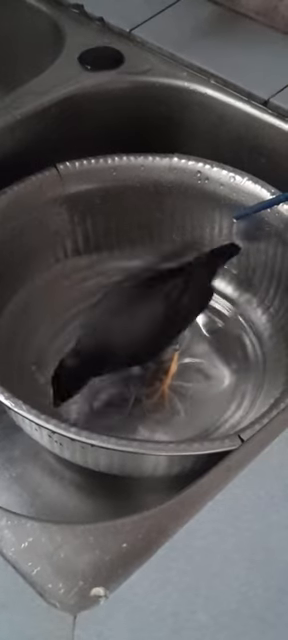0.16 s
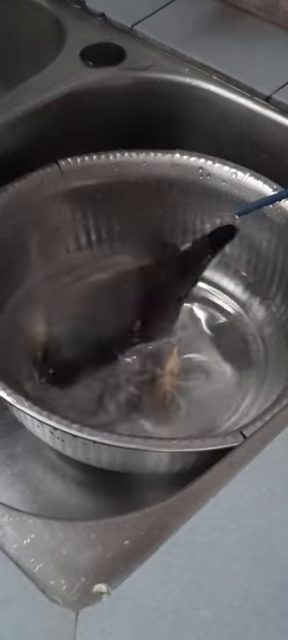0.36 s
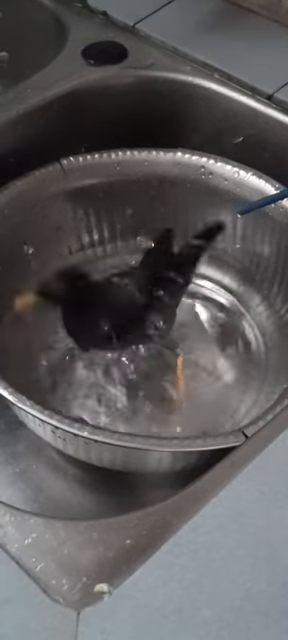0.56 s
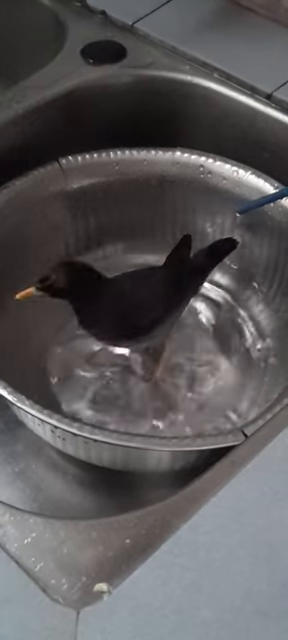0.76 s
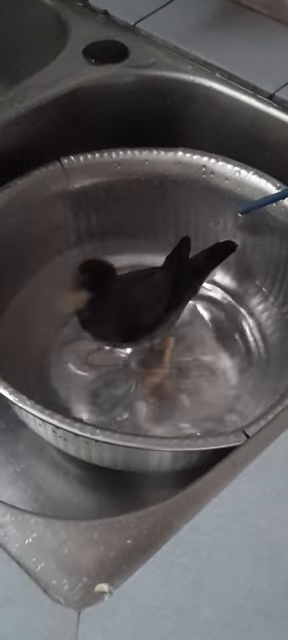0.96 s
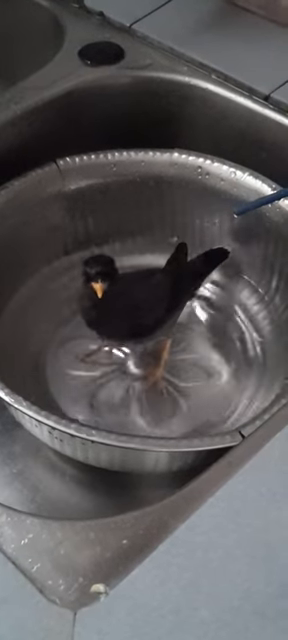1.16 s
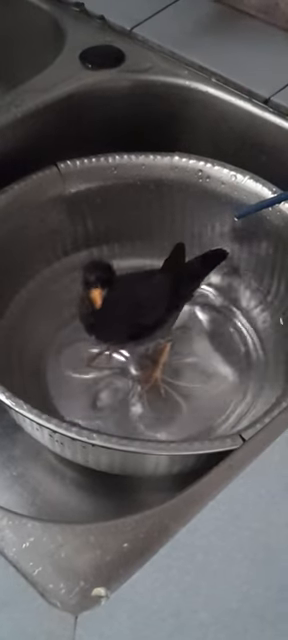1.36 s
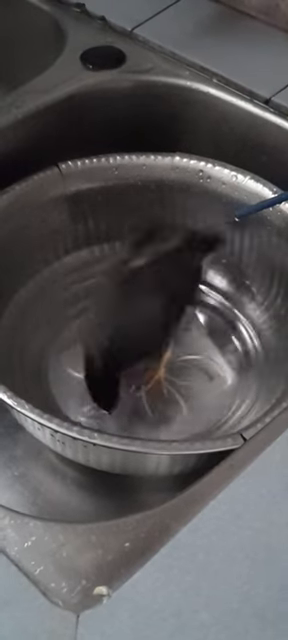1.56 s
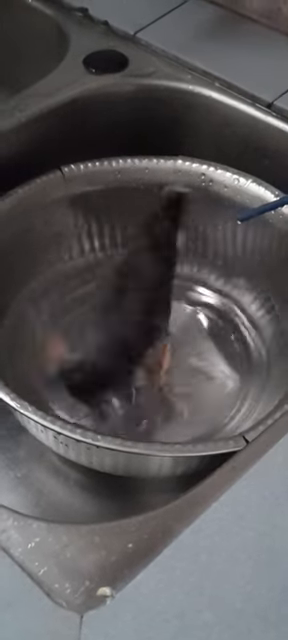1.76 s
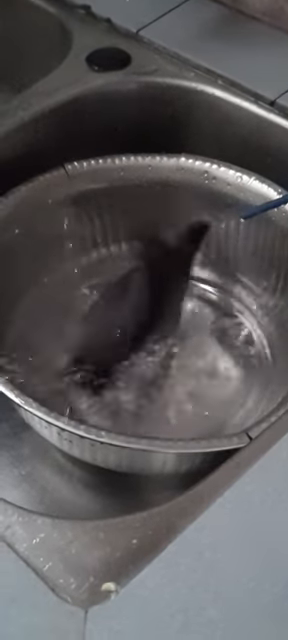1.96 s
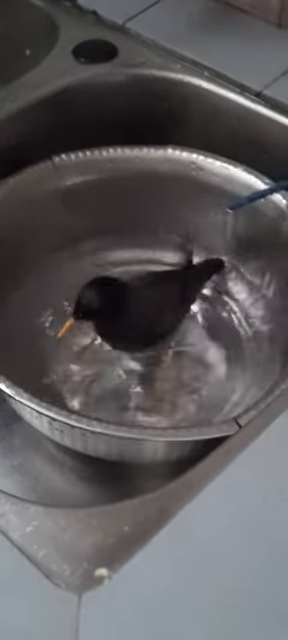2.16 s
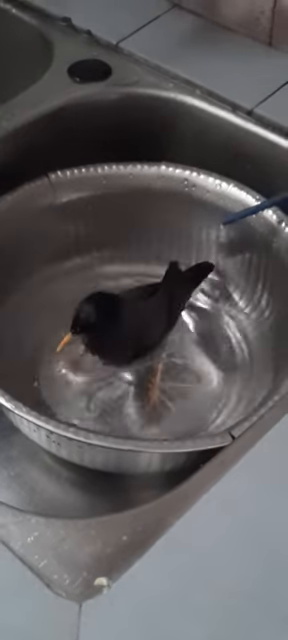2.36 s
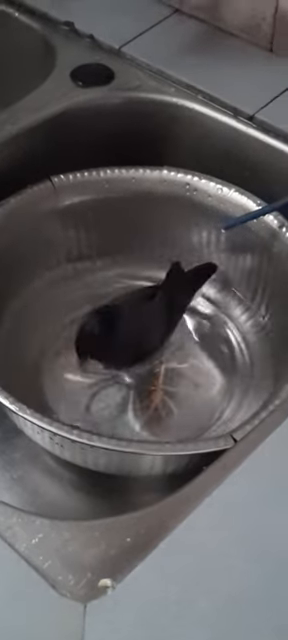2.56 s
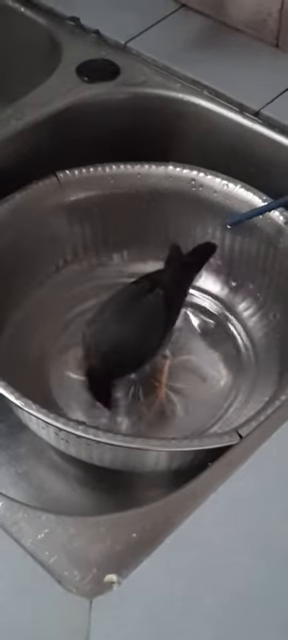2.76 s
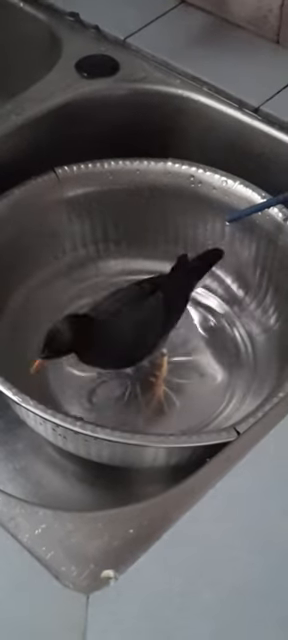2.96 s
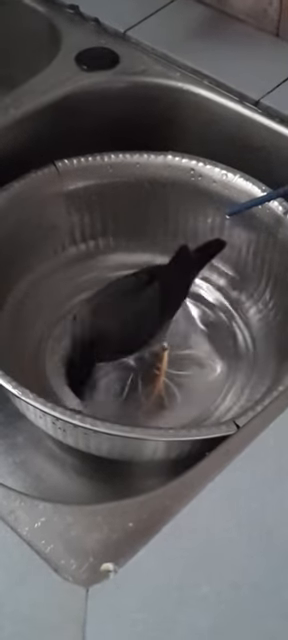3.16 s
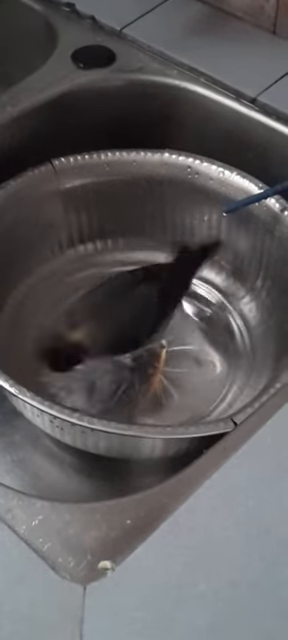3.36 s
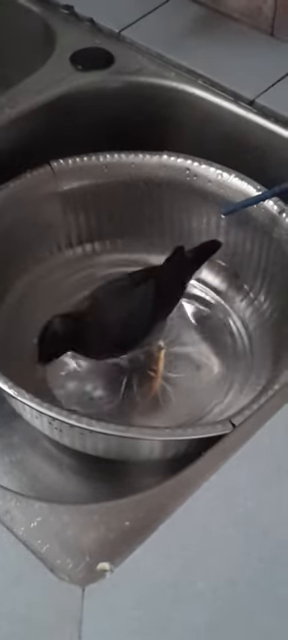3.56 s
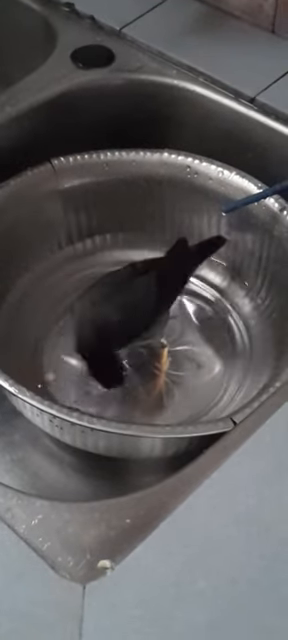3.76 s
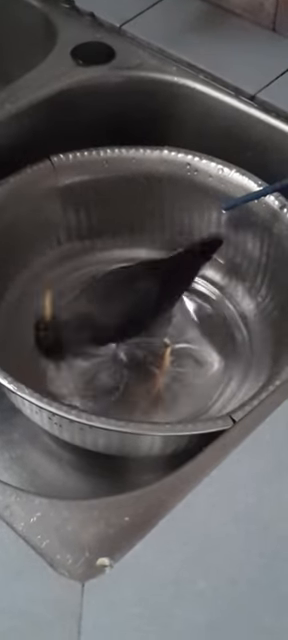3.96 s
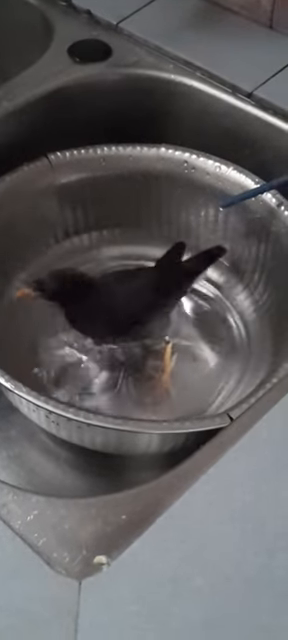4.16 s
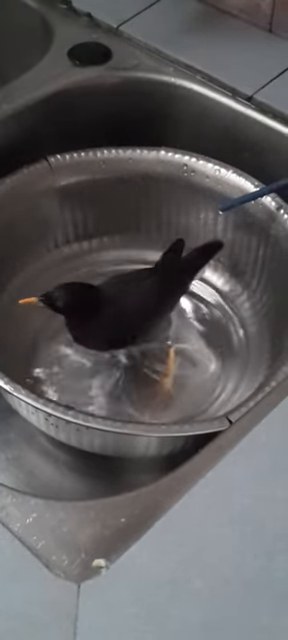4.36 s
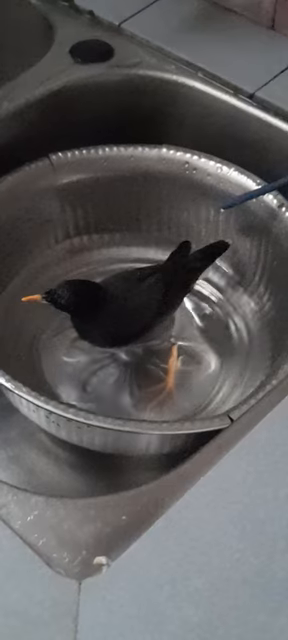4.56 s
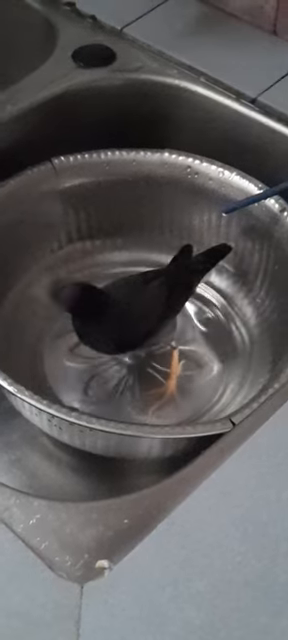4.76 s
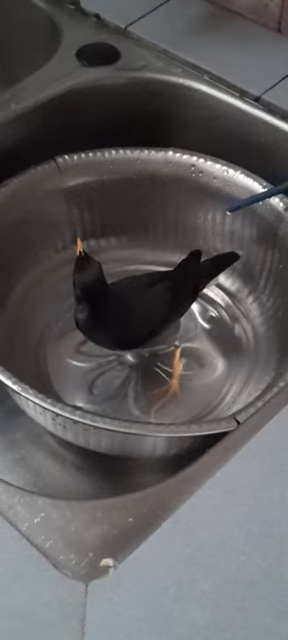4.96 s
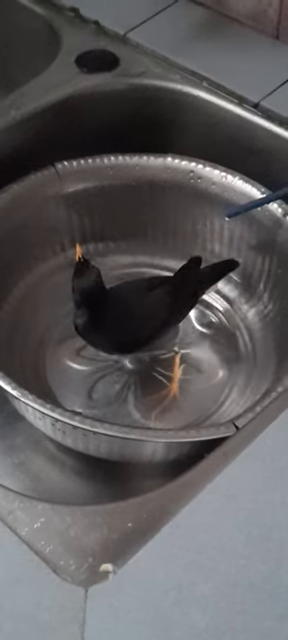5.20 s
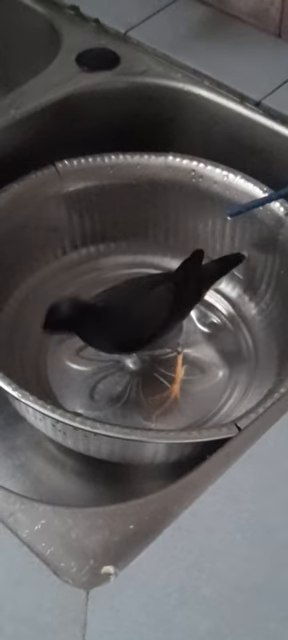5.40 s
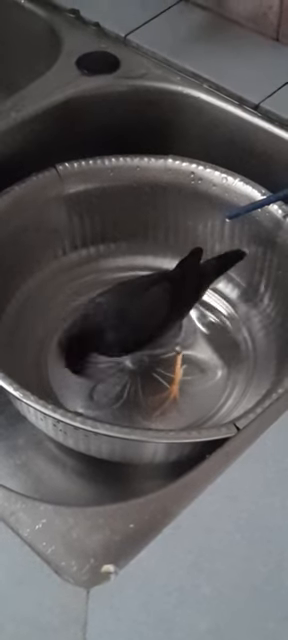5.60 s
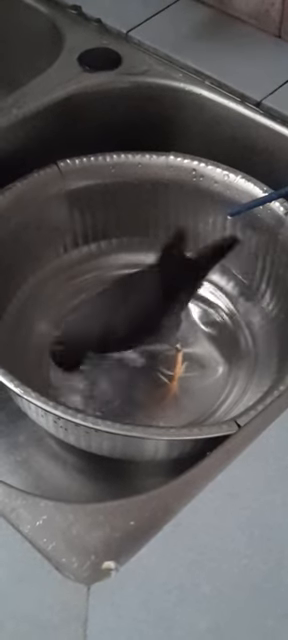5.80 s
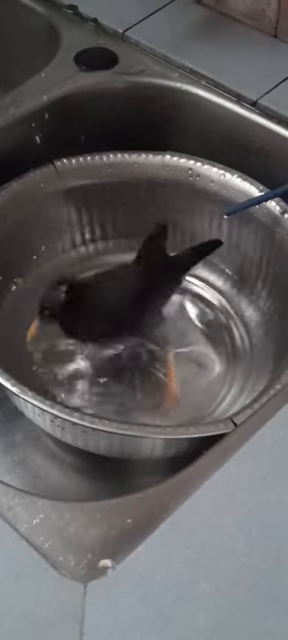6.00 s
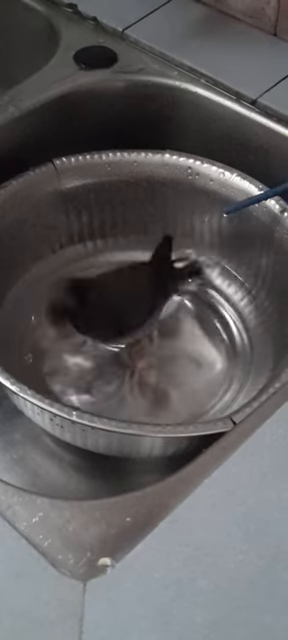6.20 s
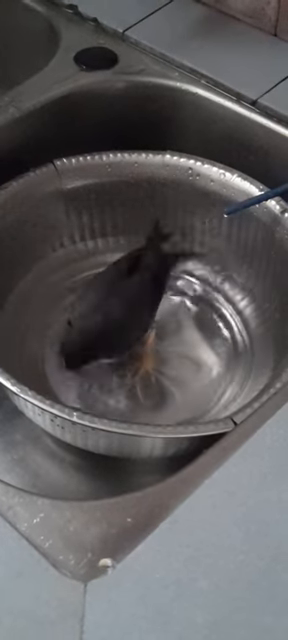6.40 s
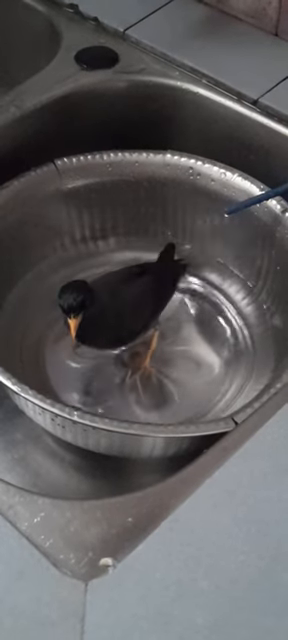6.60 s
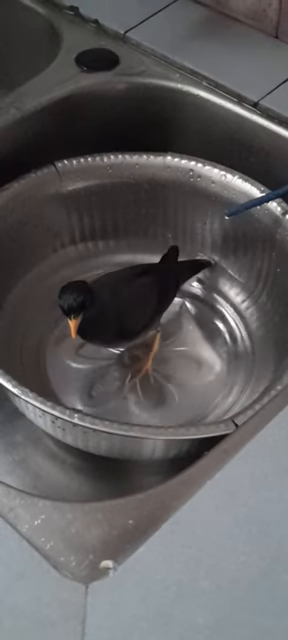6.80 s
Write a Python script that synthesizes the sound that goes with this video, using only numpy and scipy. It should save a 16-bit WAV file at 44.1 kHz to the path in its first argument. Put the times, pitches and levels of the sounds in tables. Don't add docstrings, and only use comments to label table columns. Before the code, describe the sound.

Close up, wings flutter against shallow water in sharp, wet bursts, throwing fine droplets that patter and trapping bubbles that plop. The bird pauses, leaving low electrical hum and room rumble, then flutters hard again. Gentler dabbling follows, then a final medium splash with bubbly gurgles and a few stray drips. The steel bowl booms softly and kitchen tiles add a brief bright reflection; stereo microphones sit near.

```python
import sys
import numpy as np
from scipy import signal
from scipy.io import wavfile
from scipy.ndimage import uniform_filter1d

SR = 44100
rng = np.random.default_rng(int(sys.argv[2]) if len(sys.argv) > 2 else 0)


def boost(x):
    u = np.asarray(x, float) / 20
    return 10 ** u


def master(y):
    cut = np.clip(np.atleast_2d(y).T, -1, 1)
    pcm = np.round(cut * 32767)
    wavfile.write(sys.argv[1], SR, pcm.astype(np.int16))


N = 301644


def evened(x):
    return x / np.sqrt(np.mean(x ** 2) + 1e-20)


def read(points, hz):
    f, value = np.transpose(points)
    return np.interp(np.log(hz + 1), np.log(f + 1), value)


def coloured(x, points):
    size = 8192
    gain_db = np.maximum(read(points, abs(np.fft.fftfreq(size, 1 / SR))), -70)
    log_gain = np.log(boost(gain_db))
    taps = np.fft.ifft(np.exp(np.conj(signal.hilbert(log_gain)))).real[:size // 2]
    taps = (taps / np.linalg.norm(taps)).reshape((1,) * (x.ndim - 1) + (-1,))
    return signal.oaconvolve(x, taps, axes=-1)[..., :N]


def below(x, hz):
    return signal.oaconvolve(x, signal.firwin(127, hz, fs=SR)[None], "same")


def above(x, hz, order):
    return signal.sosfilt(signal.butter(order, hz, "high", fs=SR, output="sos"), x)


def resonate(x, hz, width):
    turn = np.exp(2j * np.pi * hz * np.arange(x.shape[-1]) / SR)
    r = np.exp(-np.pi * width / SR)
    return 2 * (turn * signal.lfilter([1 - r], [1, -r], x / turn)).real


def add(mix, s, sound):
    part = mix[..., round(s * SR):][..., :sound.shape[-1]]
    part += sound[..., :part.shape[-1]]


# frequency in Hz, left-right likeness (-1 to 1).
SAME = [(25, 0.2), (60, 0.68), (180, 0.9), (550, 0.48), (1650, -0.23), (4970, 0.29), (15000, -0.2)]


def air(points, lo_hz, patchy_db):
    frames, hz = N // 512 + 5, np.fft.rfftfreq(2048, 1 / SR)
    a, b, c, d, patches = rng.standard_normal((frames, 1025, 5)).T
    patches = evened(uniform_filter1d(uniform_filter1d(patches, 30, 0), 12, 1))
    same = np.clip(read(SAME, hz), -1, 1)[:, None]
    left = a + 1j * b
    right = same * left + np.sqrt(1 - same ** 2) * (c + 1j * d)
    z = np.array([left, right]) * boost(read(points, hz)[:, None] + patchy_db * patches)
    whole_to_heard = np.sqrt((abs(z) ** 2).sum() / (abs(z[:, hz > lo_hz]) ** 2).sum())
    return evened(signal.istft(z, nperseg=2048, noverlap=1536)[1][:, :N]) * whole_to_heard


# frequency in Hz, spectrum level in dB per Hz.
RUMBLE = [(13, -59), (22, -47), (69, -8), (83, -11), (102, -9.5), (124, -13.5), (154, -9.5), (174, -22),
          (311, -10.5), (420, -18.5), (588, -22), (620, -22.5), (1500, -33.5), (1950, -53.5), (3300, -120)]
# frequency in Hz, spectrum level in dB per Hz.
HISS = [(760, -49), (1300, -14), (1870, -12), (2010, -11.5), (2490, -13), (3240, -15.5), (3570, -13),
        (4060, -15), (4500, -15), (5700, -19), (6540, -14), (8440, -19), (14700, -15), (15800, -18.5),
        (16500, -37)]
# frequency in Hz, width in Hz, level in dB.
ROOM_MODES = [(113.7, 4.9, -59), (144.2, 7.2, -61.5), (318, 65, -64.5)]
# frequency in Hz, width in Hz, level in dB.
HUM_AIR = (100.9, 9.6, -55.5)


def kitchen():
    t = np.arange(N) / SR
    hum = np.sqrt(2) * boost(-52.5) * np.sin(2 * np.pi * 100.06 * t - np.array([[.3], [0]]))
    whine = np.sqrt(2) * boost(-66.5) * np.sin(2 * np.pi * 577.5 * t + [[0], [.8]])
    feed = rng.standard_normal(N) + 0.32 * rng.standard_normal((2, N))
    modes = np.zeros((2, N))
    for hz, width, db in ROOM_MODES + [HUM_AIR]:
        modes += boost(db) * evened(resonate(resonate(feed, hz, width), hz, width))
    floor = boost(-57.5) * air(RUMBLE, lo_hz=160, patchy_db=.4)
    floor = floor + boost(-72) * air(HISS, lo_hz=2370, patchy_db=.4)
    return floor * boost([[-.7], [.7]]) + hum * boost([[1.5], [-1.5]]) + modes + whine


# start in seconds, peak in dB, heavy drops in dB, fine mist in dB.
WINGS = [(0.1248, -38, 14, -18), (0.1674, -31, 3.5, -8), (0.2733, -63, -3, -5), (0.3125, -36, 4, -2),
         (0.333, -38, -3, 1), (0.3711, -25.5, 1, 2.5), (0.4177, -22, 1, 2), (0.4577, -18.5, 3.5, -3.5),
         (0.501, -26, 3, 4), (0.6423, -41, 16, 12), (0.6756, -39, -1, 9), (0.6982, -45, -5, 13.5),
         (0.7234, -33.5, -3.5, 0), (1.7679, -61, -20, 7), (1.7873, -42, -7, 7), (1.8312, -24, 4, -7),
         (1.8714, -19.5, 3.5, 2), (1.918, -22, -5, 0), (1.9604, -21.5, 7.5, -4), (1.981, -29, 0, -18),
         (1.994, -24.5, 8, -18), (2.035, -29, -2, -5), (2.057, -30.5, 11, -3), (1.911, -30, -1, 8),
         (.525, -32, -2, 2), (5.788, -49, -10, 7), (5.824, -45.5, -12, 7), (5.8611, -37, -6, -1),
         (5.8884, -30.5, -3, 5), (5.927, -32, 8, 11), (.507, -28, 0, 1)]
# start in seconds, peak in dB, heavy drops in dB, fine mist in dB.
SHAKES = [(0.908, -50, 3, -2), (1.028, -60.5, -5, 19), (2.4533, -66.5, 2, 16), (2.61, -69, -39, 31),
          (2.8764, -45.5, -19, -3), (3.374, -37, -21, -4), (3.428, -37.5, -7, 4.5), (3.475, -41, 5.5, -4),
          (3.8006, -53, -15, 6), (3.8581, -52, -22, -2), (3.923, -45.5, -13, 7), (3.9784, -33.5, -6, 0.5),
          (4.031, -34.5, 2, 1), (4.0663, -34, -17, -4), (4.2363, -39, -16, -7), (4.2736, -44.5, -1, 4),
          (4.349, -46.5, 5, 1), (6.122, -36.5, -17, 5), (6.1441, -31.5, -29, 1), (6.2668, -54.5, 21, 1),
          (6.2913, -47, -2, 4), (6.3663, -53, 11, 2), (6.4413, -52, -11, 10), (6.472, -43, -17, 3),
          (6.5998, -51, -9, -1)]
# frequency in Hz, dB per Hz.
SPRAY_COLOUR = [(1350, -46), (2300, -7), (2930, -5), (3160, -0.5), (3700, -3.5), (3980, -2.5), (4590, -1),
                (5840, 0.5), (6450, 1), (7560, 1), (8210, -6), (11500, -3.5), (15200, -4), (16100, -32),
                (16800, -72)]
# frequency in Hz, dB per Hz.
CHURN_COLOUR = [(290, -36.5), (500, 4), (782, -1.5), (1120, -3), (1270, -2), (1640, -0.5), (2040, 0.5),
                (2800, -8.5), (3640, -57), (6160, -120)]
MIST_HZ, DROPS_HZ = 7700, 4300


def slaps():
    t = np.arange(SR // 4) / SR
    bright, body, heavy, mist = np.zeros((4, 2, N))
    crack = boost(1 - 60 * t / .011) * np.minimum(t / .0007, 1)
    for s, peak_db, heavy_db, mist_db in WINGS + SHAKES:
        body_db = 4 - 0.05 * (peak_db + 35)
        shared, ragged, *own = rng.standard_normal((4, len(t)))
        burst = np.tanh(0.5 * shared + 0.84 * np.array(own)) * boost([[.6], [-.6]])
        tearing = 0.48 * boost(-60 * t / 0.1 + 3.1 * evened(uniform_filter1d(ragged, 40)))
        burst *= boost(peak_db - 5) * (crack + tearing * np.minimum(t / 0.0025, 1))
        add(bright, s, burst)
        add(heavy, s, boost(heavy_db) * burst)
        add(mist, s, boost(mist_db) * burst)
        add(body, s, boost(body_db - 13.5) * burst)
    split = mist + below(bright - mist, MIST_HZ) + below(heavy - bright, DROPS_HZ)
    return coloured(split, SPRAY_COLOUR) + coloured(body, CHURN_COLOUR)


# frequency in Hz, width in Hz, level in dB.
SINK = [(63, 55, 5.5), (125, 68, 4.5), (190, 27, -5.5), (232, 46, -4.5), (378, 82, -3), (541, 58, -6.5),
        (632.4, 5.8, -6.5)]


def sink():
    push, kicks, t = rng.standard_normal(N), np.zeros(N), np.arange(SR // 2) / SR
    ring = np.zeros(N)
    for k, (hz, width, db) in enumerate(SINK):
        ring += (-1) ** k * boost(db) * evened(resonate(push, hz, width))
    slosh = np.minimum(t / 0.01, 1) * boost(-60 * t / 0.62)
    for s, peak_db, *_ in WINGS + SHAKES:
        add(kicks, s, (boost(-45.5 + 1.2 * (peak_db + 22)) * slosh) ** 2)
    ring = above(evened(ring), 45, order=2)
    return np.sqrt(kicks) * np.array([np.roll(ring, 12), ring])


def bubbles(rows, trim_db, rise, t60=None, calm=None):
    out = np.zeros((2, N))
    for s, peak_db, hz, *own in rows:
        life = max(own[0] if own else t60, .005)
        rough = np.clip(calm or 0.27 + 0.5 * (peak_db + 59), 0, .5)
        t = np.arange(round(SR * min(life, .25))) / SR
        wander = evened(uniform_filter1d(rng.standard_normal((2, SR // 4)), 120))
        shake, flutter = rough * wander[:, :len(t)]
        climb = rise * (np.minimum(t / life, 1) - .2)
        turns = np.cumsum(hz * (1 + climb + 0.071 * shake)) / SR
        lag = rng.uniform(0.26, 1.7) * np.array([[1], [0]])
        onset = np.minimum(t / min(0.0016, life / 20), 1)
        ring = boost(peak_db + trim_db - 60 * t / life) * (1 + flutter) * onset
        add(out, s, ring * np.sin(2 * np.pi * turns - lag) * boost([[0.6], [-0.6]]))
    return out


# start in seconds, peak in dB, pitch in Hz, decay in seconds.
FIZZ = [(0.1251, -85, 4210, .03), (0.1675, -31.5, 7240, 0.019), (0.2733, -63, 4570, .03),
        (0.3341, -46, 4570, .025), (0.3716, -31, 4000, 0.011), (0.4214, -30, 6470, 0.023),
        (0.5044, -32.5, 6670, 0.029), (0.565, -42, 3960, 0.065), (0.522, -32, 4120, 0.052),
        (0.5351, -31, 3950, 0.052), (1.8327, -23, 4880, 0.012), (1.8774, -25, 4110, 0.011),
        (1.9609, -22, 6500, 0.022), (1.9964, -30, 5000, 0.022), (2.0363, -35, 4690, 0.048),
        (6.1449, -41, 5260, 0.015), (6.3649, -46, 5500, 0.021), (6.365, -52, 4800, .01),
        (2.609, -39, 6950, 0.007), (3.428, -43, 5300, 0.014), (3.476, -45, 4360, 0.013)]
# start in seconds, peak in dB, pitch in Hz.
BUBBLES = [(0.156, -37, 2024), (0.312, -40.5, 2050), (0.333, -48, 1940), (0.457, -25, 2014),
           (1.871, -29, 2028), (1.92, -30, 1980), (1.969, -25, 2010), (1.981, -25, 1860),
           (1.994, -22.5, 2095), (2.015, -30.5, 1950), (2.058, -22, 2135), (2.067, -32, 2246),
           (2.118, -38, 2090), (2.14, -47, 2120), (1.938, -40, 2250), (1.833, -45, 2140),
           (3.429, -40, 2040), (3.989, -46, 2060), (4.031, -42, 2030), (4.065, -30, 2085),
           (5.961, -36, 1926), (6.14, -45, 2390), (1.969, -34, 3130), (5.922, -33, 2460),
           (6.306, -46, 2120)]
# start in seconds, peak in dB, pitch in Hz, decay in seconds.
PLOPS = [(0.418, -30, 1410, 0.035), (1.968, -32, 1470, .025), (1.979, -27, 1540, 0.024),
         (2.058, -34, 1550, 0.013), (2.108, -42, 1500, .015), (3.375, -53, 1440, 0.018),
         (3.49, -53, 1540, 0.25), (4.291, -45.5, 2230, 0.14), (4.33, -54, 2200, 0.088),
         (.17, -47.5, 1900, 0.068), (3.55, -55, 1980, .06), (0.4235, -21.5, 1427, 0.031),
         (0.498, -29.5, 1520, 0.023), (0.529, -42, 704, 0.012), (0.553, -26, 1303, 0.039),
         (0.562, -30, 1580, 0.035), (0.372, -40, 1880, 0.028), (0.903, -44.5, 751, 0.12),
         (2.107, -35, 800, 0.028), (2.263, -47.5, 796, 0.18), (3.475, -47, 673, 0.1),
         (3.51, -59, 1900, 0.18), (3.519, -45, 690, 0.093), (3.56, -59, 1770, .08), (3.62, -60, 1510, 0.11),
         (3.677, -56.5, 1450, 0.073), (5.862, -46, 1560, 0.013), (5.884, -47, 626, 0.025),
         (5.922, -19, 1630, 0.0089), (6.136, -37.5, 1497, 0.14), (6.148, -35.5, 1636, 0.049),
         (6.171, -38, 1577, 0.08), (6.33, -42, 1410, 0.051), (5.93, -36, 1400, 0.032),
         (6.15, -46, 2000, .06), (6.195, -42.5, 1595, 0.073), (6.23, -46, 1610, 0.046),
         (6.305, -40.5, 1625, 0.054), (6.306, -36, 1404, 0.081), (6.314, -36.5, 1434, 0.12),
         (6.324, -45, 1043, 0.17)]


def trapped_air():
    fizz = bubbles(FIZZ, trim_db=-1, rise=0.032, calm=0.25)
    middling = bubbles(BUBBLES, trim_db=-8, rise=0.092, t60=0.062)
    return fizz + middling + bubbles(PLOPS, trim_db=-4.5, rise=0.098)


def droplets(per_s, spread_db, cycles, lo_hz, hi_hz, count):
    clumps = boost(2.5 * evened(uniform_filter1d(rng.standard_normal(N), 250)))
    out = np.zeros((2, N))
    at = rng.integers(0, N, (count, round(N / SR * per_s / count)))
    for hz, places in zip(np.geomspace(lo_hz, hi_hz, count), at):
        u = np.arange(0, 2.0 * cycles, hz / SR)
        grain = np.sin(2 * np.pi * u * (1 + 0.0052 * u)) * np.exp(-u / cycles * 2) * np.minimum(u, 1)
        grain *= np.sqrt(hz) / np.linalg.norm(grain)
        train = np.zeros((2, N + 40))
        size = boost(spread_db * np.minimum(rng.exponential(1, len(places)), 5)) * clumps[places]
        train[0, places] = size
        train[1, places + rng.integers(0, 30, len(places))] = size
        out += signal.oaconvolve(train, grain[None], axes=1)[:, :N]
    return out


def swell(s, up_db, down_db):
    t = np.arange(0, N + 32, 32) / SR - s
    return boost(np.where(t < 0, up_db * t, -down_db * t))


# peak time in seconds, level in dB, low churn in dB relative to it,
# build-up in dB per second, fall in dB per second.
SHOWERS = [(.135, -58.5, -15, 1500, 50), (0.542, -34, -3.5, 244, 800), (.56, -47, 5.5, 90, 79),
           (.33, -59.5, 6, 300, 50), (1.45, -87.5, 24.5, 8, 5), (1.795, -51.5, 0, 702, 40),
           (1.84, -46, -12, 902, 67), (2.006, -42, -4, 96, 147), (2.18, -62, 3.5, 200, 46),
           (2.9, -59.5, -2, 1189, 246), (3.44, -59.5, 2, 95, 152), (3.53, -74.5, 21.5, 70, 58),
           (3.975, -60.5, 2, 174, 100), (4.062, -50, 1.5, 120, 158), (4.26, -56, 4.5, 500, 104),
           (5.8, -59, -8, 600, 32), (5.932, -43, 0, 238, 207), (6.14, -49, -23, 1203, 330),
           (6.22, -66, 7.5, 300, 32), (6.49, -62, 2, 50, 110)]


def spray():
    patter = gurgle = 0
    for s, level_db, churn_db, up_db, down_db in SHOWERS:
        shower = boost(level_db) * swell(s, up_db, down_db)
        patter = np.hypot(patter, shower)
        gurgle = np.hypot(gurgle, boost(churn_db) * shower)
    patter, gurgle = np.repeat(patter, 32)[:N], np.repeat(gurgle, 32)[:N]
    fine = droplets(7000, spread_db=3.0, cycles=13.0, lo_hz=2385, hi_hz=16450, count=16)
    churn = droplets(3500, spread_db=0.5, cycles=7.4, lo_hz=615, hi_hz=2716, count=9)
    fine, churn = evened(coloured(fine, SPRAY_COLOUR)), evened(coloured(churn, CHURN_COLOUR))
    heavy_share = np.minimum((patter / boost(-72)) ** 0.14, 1)
    fine = fine - (1 - heavy_share) * below(fine, DROPS_HZ)
    return boost([[-2.9], [-4.1]]) * patter * fine + boost(-8.5) * gurgle * churn


def scattered(x, patchy_db):
    z = signal.stft(x, nperseg=256)[2]
    patches = rng.standard_normal(z.shape[:0:-1]).T
    patches = evened(uniform_filter1d(uniform_filter1d(patches, 5, 0), 4, 1))
    return signal.istft(z * boost(patchy_db * patches - 1), nperseg=256)[1][:, :N]


def snap_of(noise, t, peak_s):
    return np.sign(noise) * (t / peak_s) * np.exp(1 - t / peak_s)


# start in seconds, peak in dB, lowest frequency in Hz.
CLICKS = [(.366, -40, 1500), (.3725, -25.5, 7000), (.4252, -36, 4500), (.4604, -21, 2500),
          (.607, -48, 2200), (1.028, -48, 8000), (1.8335, -19, 4000), (1.8722, -27, 1500),
          (1.911, -36, 8000), (1.9197, -21, 8000), (1.931, -39, 4500), (1.9705, -27, 1300),
          (2.109, -37, 900), (2.279, -48, 5000), (2.6093, -43, 5030), (2.6185, -45, 9000),
          (2.877, -49, 4500), (2.8785, -51, 5000), (3.375, -53, 1200), (3.4285, -42, 1500),
          (3.4775, -38, 1200), (3.9785, -44, 1800), (4.0192, -45, 8000), (4.0315, -41, 1800),
          (4.3495, -48, 3500), (4.36, -53, 4000), (5.8885, -39, 8000), (5.9225, -39.5, 1300),
          (5.9278, -21, 6950), (5.884, -32, 1000), (5.937, -34, 6000), (1.9616, -23, 3000),
          (1.8327, -22, 7000), (4.238, -45, 1500), (4.0663, -33, 1500), (.6756, -38, 7000),
          (6.5995, -54, 4000), (6.122, -38, 4500), (6.292, -45, 5500), (6.305, -43, 1500),
          (6.4418, -52, 8100)]


def clicks():
    t, out = np.arange(200) / SR, np.zeros((2, N))
    for s, peak_db, lowest_hz in CLICKS:
        snap = above(snap_of(rng.standard_normal(len(t)), t, .0004), lowest_hz, order=3)
        add(out, s, boost(peak_db) * np.array([np.roll(snap, 4), snap]) / abs(snap).max())
    return out


# start in seconds, peak in dB.
THUMPS = [
    (0.372, -41),
    (0.401, -31.5),
    (0.423, -28.5),
    (0.469, -30),
    (0.496, -41),
    (1.869, -38),
    (1.958, -42),
    (4.028, -45),
    (5.9, -39.5),
]


def feet():
    rows = [(s, peak_db, 197) for s, peak_db in THUMPS]
    return bubbles(rows, trim_db=-7.5, rise=0.0092, t60=.29, calm=.05)


# start in seconds, peak in dB, pitch in Hz.
TICKS = [(0.3725, -28, 12000), (1.832, -22, 11500), (1.895, -29, 11000), (1.9197, -21, 11600),
         (2.609, -41, 14500), (2.6093, -41, 16300), (2.877, -52, 14000), (6.4418, -46, 16300),
         (5.9285, -25, 13000), (6.122, -36, 14000), (6.3665, -41, 12500), (6.4418, -40, 14500)]


def ticks():
    return bubbles(TICKS, trim_db=-4, rise=.03, t60=.006, calm=.4)


# start in seconds, peak in dB.
SMACKS = [
    (0.4245, -24),
    (0.4584, -20),
    (1.8317, -19),
    (1.9606, -18),
    (4.0652, -33),
    (5.9274, -24),
    (3.4748, -38),
]


def smacks():
    t, out = np.arange(300) / SR, np.zeros((2, N))
    for s, peak_db in SMACKS:
        snap = snap_of(rng.standard_normal(len(t)), t, .0006)
        add(out, s, boost(peak_db - 6.5) * np.array([np.roll(snap, 5), snap]))
    return coloured(out, SPRAY_COLOUR)


# frequency in Hz, time to fall 60 dB in seconds.
TILES = [(200, 0.5), (1500, 0.37), (4000, 0.31), (8000, 0.16), (16000, 0.16)]


def tiles(x):
    taps = np.zeros((2, SR // 2))
    at = np.arange(120, SR // 2 - 20, 20) + rng.integers(0, 20, (2, (SR // 2 - 121) // 20))
    np.put_along_axis(taps, at, rng.choice([-1., 1.], at.shape), 1)
    hz, t, z = signal.stft(taps, SR, nperseg=256)
    tail = signal.istft(z * boost(-60 * t / read(TILES, hz)[:, None]), SR, nperseg=256)[1]
    return signal.fftconvolve(x.mean(0)[None], tail / np.linalg.norm(tail[0]), axes=1)[:, :N]


def scene():
    background = kitchen()
    water = scattered(slaps() + spray(), patchy_db=2.2) + clicks() + ticks() + smacks()
    ringing = trapped_air()
    echoes = boost(-2) * tiles(water + 0.42 * ringing)
    return background + water + sink() + ringing + feet() + echoes


# frequency in Hz, width in Hz, depth in dB.
PORT_DIPS = [(3450, 600, -7), (8300, 700, -6)]


def housing(x):
    for hz, width, db in PORT_DIPS:
        x = x - (1 - boost(db)) * resonate(x, hz, width)
    return x


def top_cut(x):
    return signal.sosfilt(signal.butter(12, 16990, fs=SR, output="sos"), x)


def record(dry):
    edge_hz = 15900
    edge = signal.firwin(255, edge_hz, window=("kaiser", 7), fs=SR)
    leak = signal.firwin(255, [edge_hz, 16900], pass_zero=False, fs=SR)
    mix = signal.oaconvolve(housing(dry), (edge + boost(-10) * leak)[None], "same")
    return top_cut(mix)


dry = scene()
out = record(dry)
master(out)
```